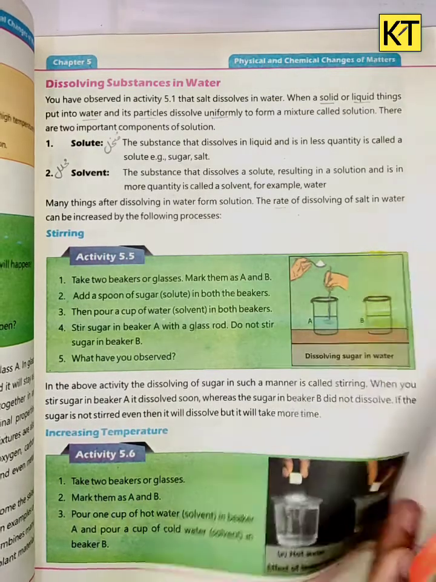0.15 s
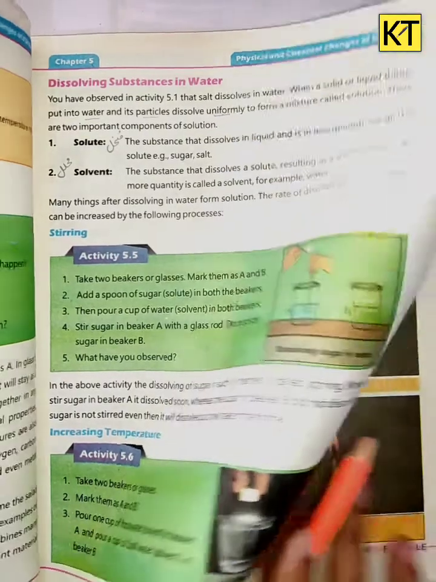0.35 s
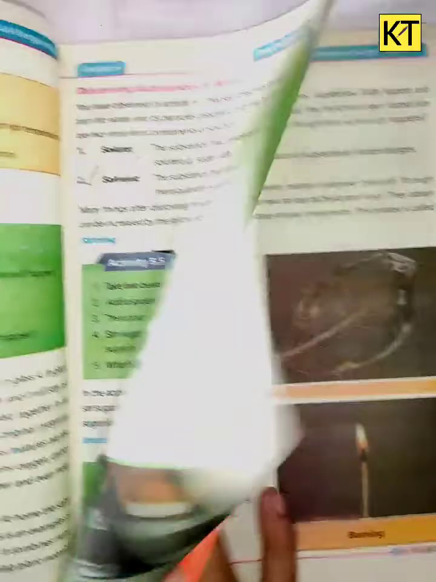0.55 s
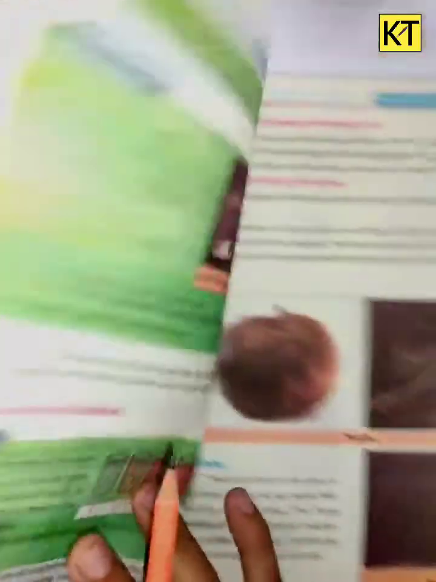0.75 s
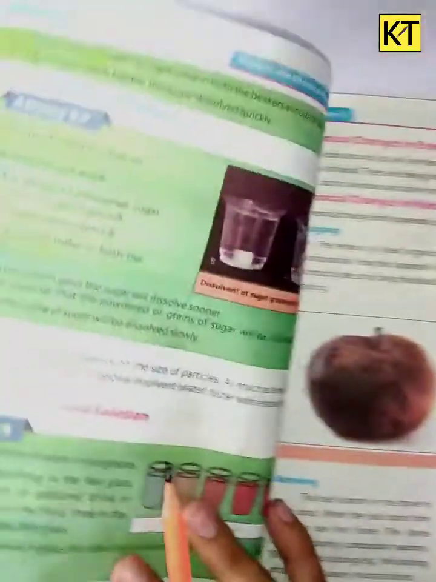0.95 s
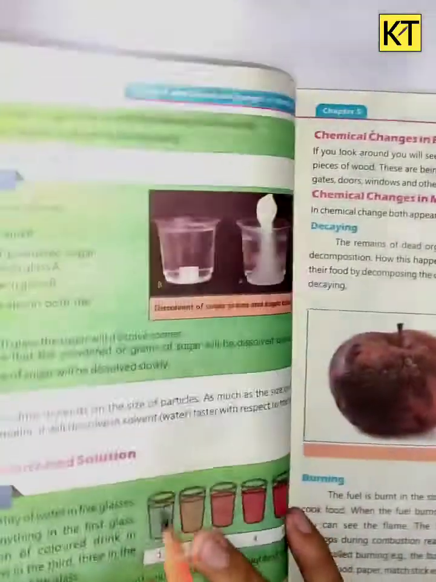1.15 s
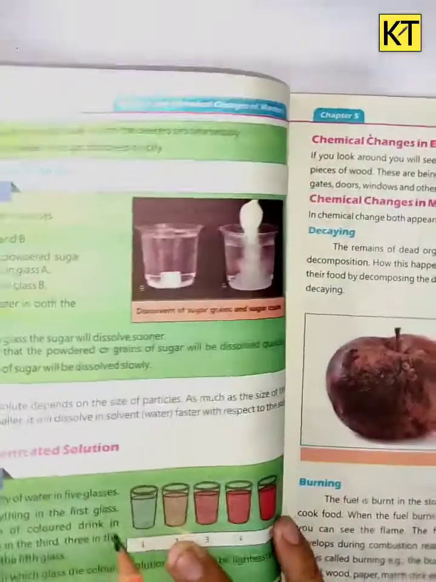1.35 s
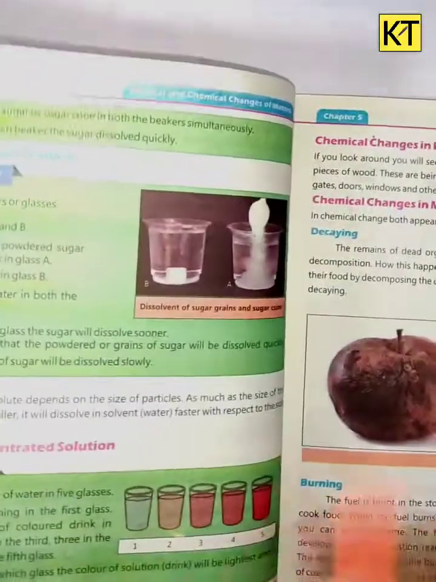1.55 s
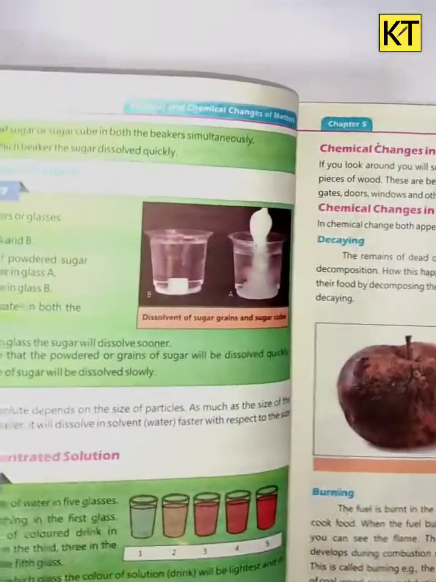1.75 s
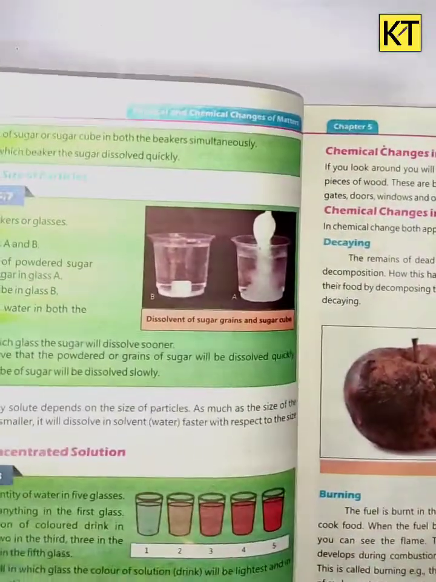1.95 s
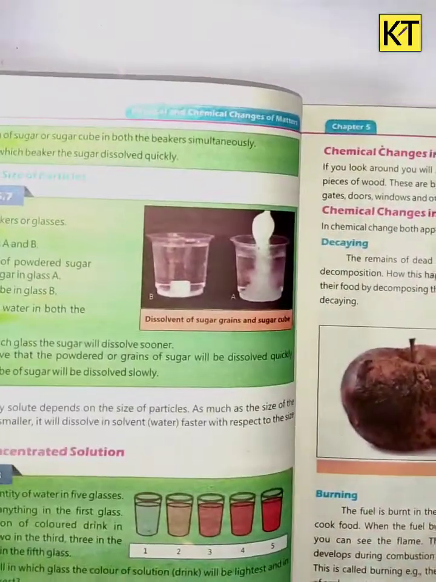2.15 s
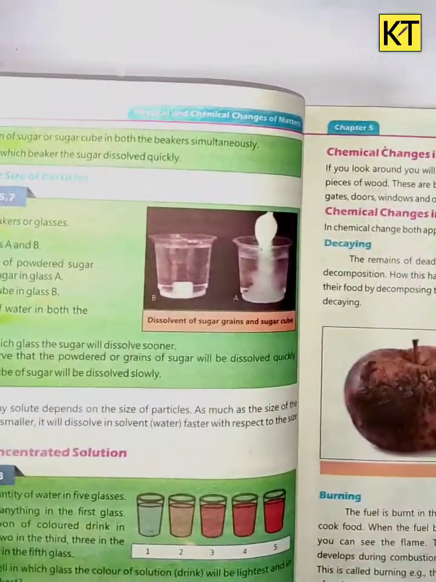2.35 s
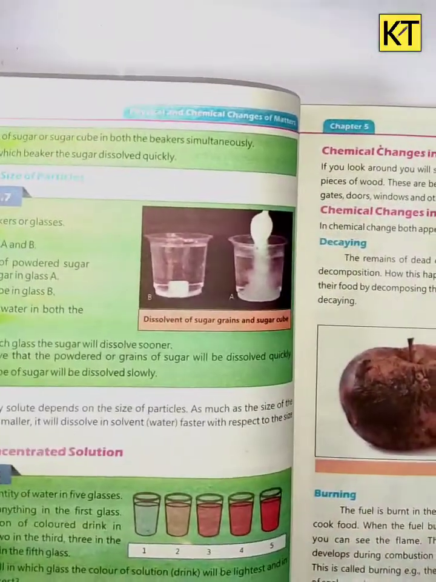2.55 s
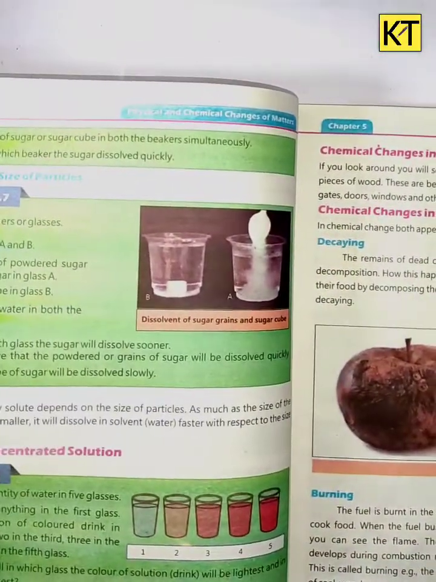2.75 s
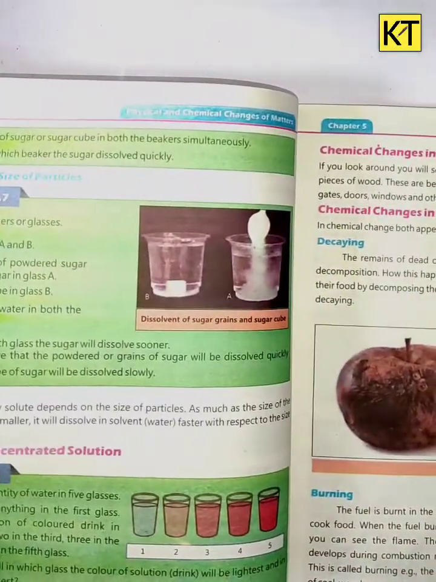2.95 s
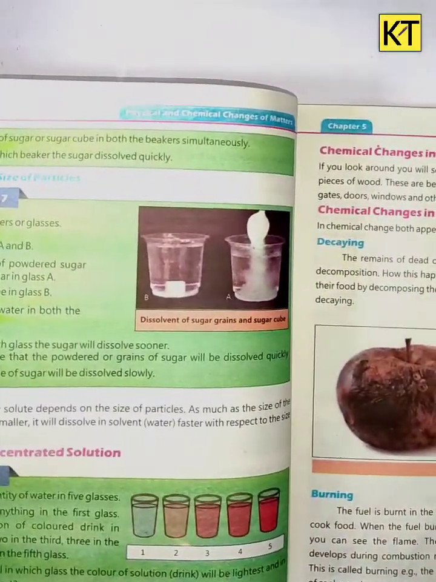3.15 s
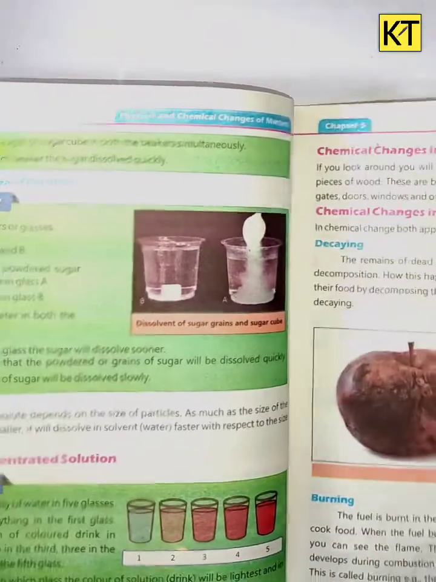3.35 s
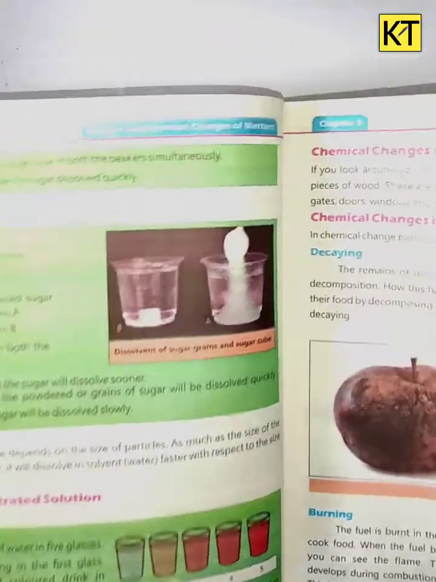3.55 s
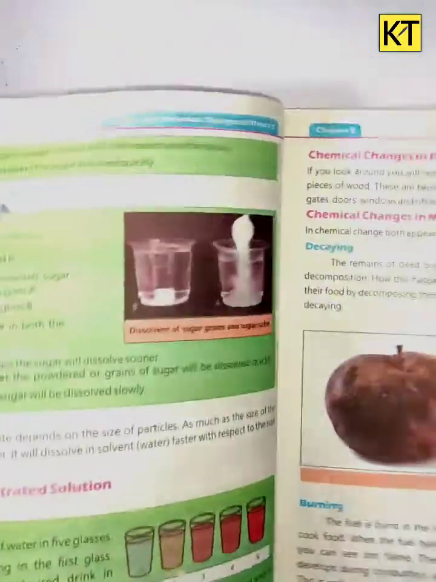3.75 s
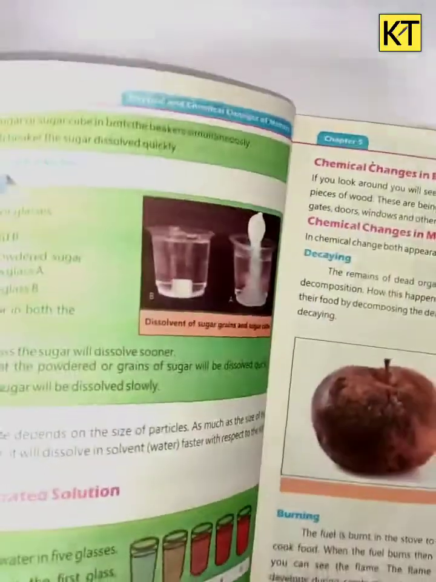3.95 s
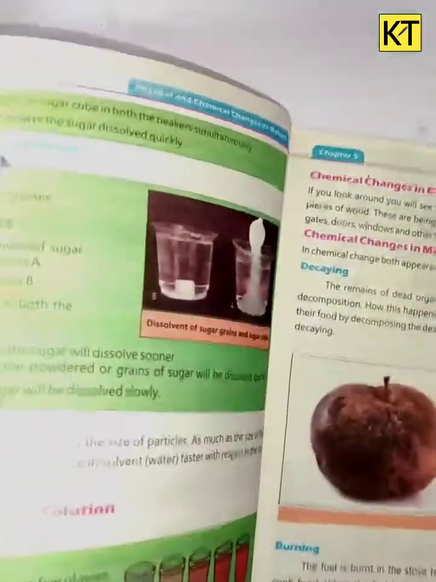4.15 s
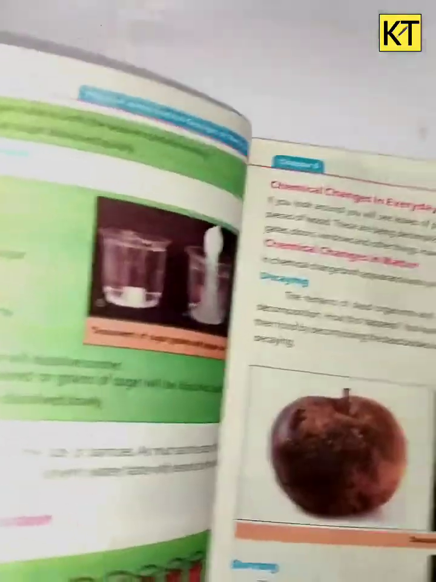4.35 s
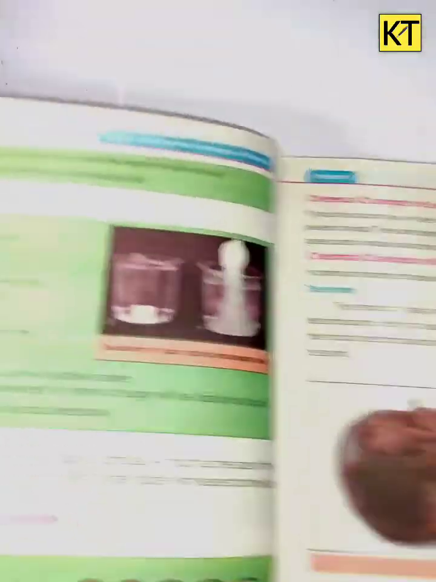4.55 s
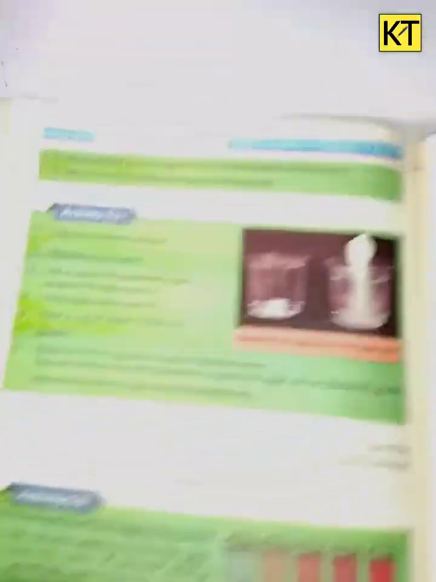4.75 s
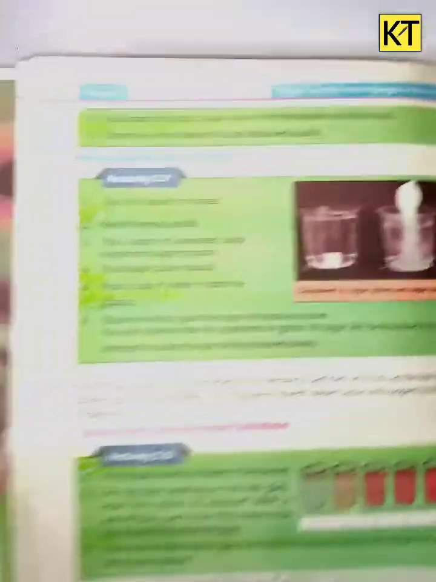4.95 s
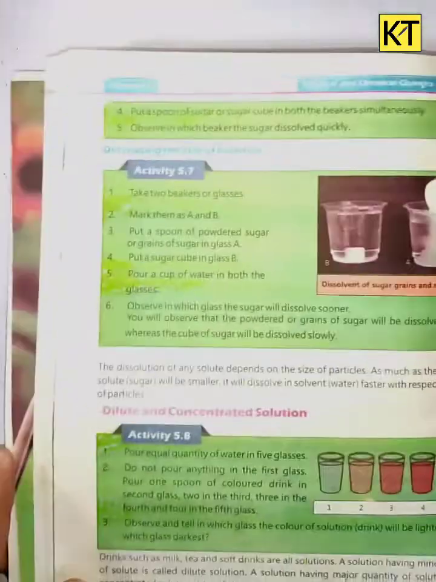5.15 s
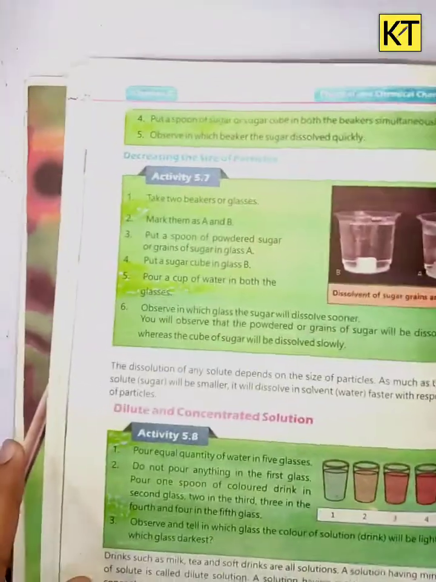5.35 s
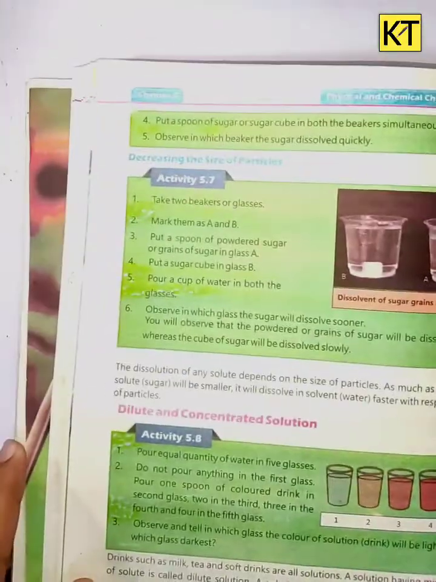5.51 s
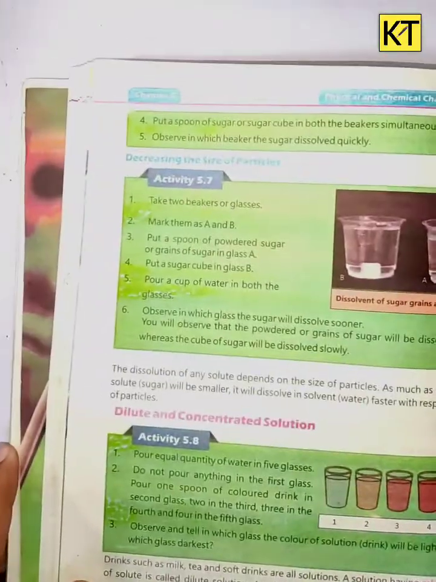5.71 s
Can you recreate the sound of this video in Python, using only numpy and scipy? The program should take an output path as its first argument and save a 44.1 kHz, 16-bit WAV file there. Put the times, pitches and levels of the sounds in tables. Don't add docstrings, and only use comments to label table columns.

```python
import sys
import numpy as np
from scipy import signal
from scipy.fft import rfft, irfft, next_fast_len
from scipy.io import wavfile
from scipy.ndimage import uniform_filter1d

SR = 44100
rng = np.random.default_rng(int(sys.argv[2]) if len(sys.argv) > 2 else 0)


def transcribe(signal):
    frames = np.atleast_2d(signal).T
    limited = np.clip(frames, -1, 1)
    pcm = np.round(limited * 32767).astype(np.int16)
    wavfile.write(sys.argv[1], SR, pcm)


def elevation(decibels):
    levels = np.asarray(decibels, float)
    return 10 ** (levels / 20)


N = 254795


def at_hz(points, hz, column=1):
    points = np.array(points)
    return np.interp(np.log(np.maximum(hz, 1)), np.log(points[:, 0]), points[:, column])


def rms_one(x):
    return x / np.sqrt(np.mean(x ** 2) + 1e-20)


def peak_one(x):
    return x / np.max(np.abs(x))


def drift(rate):
    r = np.exp(-80 * np.pi * rate / SR)
    white = rng.standard_normal(N // 40 + 2002)
    slow = signal.lfilter([1], [1, -2 * r, r * r], white)[2000:]
    return np.interp(np.arange(N) / 40, np.arange(len(slow)), rms_one(slow))


def ring(clicks, hz, t60):
    r = elevation(-60 / (t60 * SR))
    w = 2 * np.pi * hz / SR
    return signal.lfilter([0, np.sin(w)], [1, -2 * r * np.cos(w), r * r], clicks)


def colour(x, gain_db):
    size = next_fast_len(x.shape[-1])
    hz = np.arange(size // 2 + 1) * SR / size
    return irfft(rfft(x, size) * elevation(gain_db(hz)), size)[..., :x.shape[-1]]


def filtered(x, order, hz, kind):
    return signal.sosfilt(signal.butter(order, hz, kind, fs=SR, output="sos"), x)


# (frequency [Hz], left-right likeness [0 to 1])
PORT_LIKENESS = [(60, 0.17), (180, 0.17), (550, 0.5), (1650, 0.13), (4970, 0.0066), (15000, 0.26)]
EDGES = 20 * 2 ** np.arange(0, 9.8, .4)


def bands(white, low_hz, high_hz):
    for k, (low, high) in enumerate(zip(EDGES, EDGES[1:])):
        hz = np.sqrt(low * high)
        if low_hz <= hz < high_hz:
            mid, side = filtered(white[k % 2], 2, [low, high], "band")
            alike = np.clip(at_hz(PORT_LIKENESS, hz), 0, 1)
            yield hz, np.sqrt(1 + alike) * mid + np.sqrt(1 - alike) * side * [[1], [-1]]


def strokes(rows, bend):
    fall_db = 17.5
    t = np.arange(0, N + 64, 64) / SR
    power = 1e-11
    for s, rise, fall, level_db, second_db in rows:
        after = np.maximum(t - s - rise, 0) / max(fall, .01)
        swell = np.clip((t - s) / max(rise, .003), 0, 1)
        shape = swell * elevation(level_db - fall_db * after ** bend)
        power = power + (shape * elevation(np.array([[0], [second_db]]))) ** 2
    return [np.interp(np.arange(N) / SR, t, np.sqrt(p)) for p in power]


# (frequency [Hz], level [dB per Hz])
AIR_COLOUR = [(12, -24), (25, -2), (100, -10.5), (377, -17.5), (873, -20), (1400, -24), (2400, -26.5),
              (3600, -33), (7000, -33.5), (8800, -33.5), (10000, -43), (12500, -38), (14800, -47.5),
              (15500, -46), (15900, -65.5)]


def air():
    level_db, rumble_lumps_db, rumble_below_hz = -60.5, 4.5, 130
    white = colour(rng.standard_normal((2, 2, N)), lambda hz: at_hz(AIR_COLOUR, hz))
    hush = 0
    for hz, band in bands(white, 20, 17000):
        lumps_db = -rumble_lumps_db if hz < rumble_below_hz else 1.5
        hush = hush + elevation(lumps_db * drift(2.7)) * band
    return elevation(level_db - 5.5) * rms_one(hush)


# (frequency [Hz], level [dB], t60 [s])
ROOM_ECHO = [(97, -9, 0.82), (304, -23.5, 0.7), (886, -19, 0.39), (2500, -16, 0.32), (7040, -12.5, 0.52),
             (14200, -44, 0.15)]


def room():
    t = np.arange(SR * 3 // 4) / SR
    echo = 0
    for hz, band in bands(rng.standard_normal((2, 2, len(t))), 60, 17000):
        t60 = at_hz(ROOM_ECHO, hz, column=2)
        echo = echo + elevation(at_hz(ROOM_ECHO, hz) - 60 * t / t60) * band
    return echo * (1 - np.exp(-(t / 0.0063) ** 2)) * elevation(-24)


# (time [s], peak level [dB])
TABLE_BUMPS = [
    (1.408, -42.5),
    (2.118, -55.5),
    (2.929, -52.5),
    (3.814, -34.5),
    (3.989, -48.5),
    (4.521, -47.5),
    (5.1, -51.5),
]


def table():
    hum_hz, hum_t60_s = 92, 0.19
    pushes = np.zeros(N) + 1e-18
    pushes[[round(s * SR) for s, db in TABLE_BUMPS]] = elevation(np.array(TABLE_BUMPS)[:, 1] - 25.5)
    n = np.arange(700)
    unsteady = .07 + .3 * rng.standard_normal(700)
    nudge = np.hanning(700) * unsteady * np.sin(n * 2 * np.pi * hum_hz / SR)
    soft = np.convolve(pushes, nudge)[:N]
    return filtered(ring(soft, hum_hz, hum_t60_s), 2, 140, "low")


# (frequency [Hz], level [dB per Hz])
PAPER_COLOUR = [(76, -44), (130, -20), (166, -12.5), (335, -11), (1000, -4), (1700, -7.5), (2800, -10.5),
                (3600, -12), (6900, 0), (8600, -5.5), (9800, -10), (12100, -24), (14800, -11), (15500, -18),
                (15900, -50)]
# (start [s],
# rise [s], fall [s], hiss level [dB], scrape level [dB re hiss])
FINGER_GLIDES = [
    (.172, 0.085, 0.28, -37.5, -6.5),
    (.3, 0.16, 0.082, -39.5, -11),
    (.4, 0.05, 0.28, -43, -1),
    (.555, 0.098, 0.094, -39, -7),
    (.745, 0.015, 1, -53.5, 4),
    (.83, 0.063, 0.11, -47, -2),
    (.96, 0.058, 0.11, -51, -3.5),
    (1.11, 0.042, 0.13, -40.5, -6.5),
    (1.245, 0.077, 0.3, -53, -8),
    (1.52, 0.046, 0.12, -51, -4.5),
                 (1.79, 0.027, 0.17, -59.5, -13.5), (2.02, 0.0059, 0.043, -65, 10),
               (2.209, 0.061, 0.078, -52, -1), (2.43, 0.0087, 0.15, -67.5, -2.5),
               (2.673, 0.0079, 0.057, -66, 0), (2.749, 0.12, .05, -71, 0), (2.898, 0.068, 0.15, -46.5, 2),
               (3.07, 0.082, 0.17, -65, 3), (3.18, 0.043, 0.39, -65, 2.5), (3.42, 0.015, 0.12, -57, 13),
               (3.6, 0.1, 0.14, -63.5, -2), (3.739, 0.05, 0.042, -51, 4), (3.83, 0.079, 0.13, -60.5, -3),
               (3.979, 0.0081, 0.14, -64.5, 4.5), (4.15, 0.073, 0.39, -70, 1.5),
               (4.389, .18, 0.15, -61.5, -2.5), (4.75, .14, 0.057, -65.5, -1.5),
               (4.92, 0.18, 0.051, -61.5, -3), (5.346, 0.025, 0.11, -53, -2),
               (5.47, 0.038, 0.071, -65.5, 4), (5.57, 0.037, 0.082, -71, -5)]
# (start [s], rise [s],
# fall [s], rub level [dB], flutter level [dB re rub])
SHEET_RUBS = [
    (.18, 0.06, 1, -57.5, -8.5),
    (.42, 0.11, 0.048, -48, -8),
    (.55, 0.054, 0.23, -50, -10),
    (.742, 0.012, 1, -51, -7.5),
    (.96, 0.0075, 0.23, -58, -22),
    (1.04, .04, 0.073, -51, -14),
    (1.12, 0.015, 0.11, -50, -8.5),
    (1.245, .01, 0.3, -63.5, 0),
    (1.53, 0.0079, 0.095, -60, -1),
              (1.8, 0.027, 0.041, -60, -12), (2.1, 0.16, 0.12, -66, -5), (2.219, 0.041, 0.07, -53.5, -9.5),
             (2.4, .2, 0.38, -76, -5), (2.899, .01, 0.28, -50.5, -12), (3.03, 0.076, 0.047, -48, -31),
             (3.13, 0.04, 0.31, -60, -11), (3.25, 0.16, 0.16, -59, -6), (3.42, 0.02, 0.13, -46, -7.5),
             (3.55, 0.051, 0.34, -63, -6), (3.741, 0.015, 0.25, -50, -9.5), (3.83, .05, 0.3, -59, -9),
             (3.99, 0.01, 0.14, -56.5, 5.5), (4.1, 0.17, 0.3, -71, -3.5), (4.4, 0.11, 0.17, -63, -2.5),
             (4.7, 0.2, 0.029, -68, 1), (4.921, 0.17, .04, -64, -1.5), (5.1, 0.012, 0.18, -74.5, 14),
             (5.25, 0.018, 0.17, -60.5, 7), (5.35, 0.022, 0.18, -59.5, 2), (5.46, 0.042, 0.047, -52.5, -11),
             (5.57, 0.091, 0.32, -74, 3)]


def slide(grain_db, patchy_db):
    rub, flutter = strokes(SHEET_RUBS, bend=1.33)
    hiss, scrape = strokes(FINGER_GLIDES, bend=1.5)
    catches = uniform_filter1d(rng.exponential(1, N), size=24)
    grains = elevation(grain_db * np.minimum(catches, 3))
    white = colour(rng.standard_normal((2, 2, N)) * grains, lambda hz: at_hz(PAPER_COLOUR, hz))
    clumps = elevation(0.98 * drift(45))
    spans_hz = [(120, 680), (680, 1600), (1600, 3700), (3700, 17000)]
    out = 0
    for level, span in zip([flutter, rub, scrape, hiss], spans_hz):
        layer = sum(elevation(patchy_db * drift(9.6)) * band for hz, band in bands(white, *span))
        out = out + level * clumps * rms_one(layer)
    return out


# (start [s], rise [s], fall [s], level [dB], pitch [Hz])
EDGE_CREAKS = [
    (3.12, 0.13, .25, -61.5, 950),
    (3.8, 0.0205, 0.14, -47, 920),
    (4.441, .02, 0.084, -70.5, 1000),
    (5.38, 0.016, 0.022, -58.5, 1100),
    (0.575, 0.023, 0.16, -44.5, 2050),
    (4.99, 0.047, .06, -65, 1620),
]


def creaks():
    width = 0.3
    out = 0
    for *stroke, hz in EDGE_CREAKS:
        t60 = 2.2 / (width * hz)
        song = ring(ring(rng.standard_normal(N), hz, t60), hz, t60)
        out = out + strokes([(*stroke, 0)], bend=1.33)[0] * rms_one(song)
    return out


# (frequency [Hz], level [dB], t60 [s])
BLOCK_TONES = [(164.6, -21.5, 0.1), (179, -2, 0.087), (239.6, -6.5, 0.098), (306.5, 0.5, 0.08),
               (427, 1, 0.04), (560.4, -6, 0.16)]
# (frequency [Hz], level [dB])
SNAP_COLOUR = [(100, -17), (2500, 11), (3600, 7), (7000, 10.5), (9000, 2), (12000, -27), (15000, -5)]


def snaps(rows, rough_share):
    t = np.arange(4096) / SR
    out = np.zeros((2, N + len(t)))
    pushes = np.zeros(N + len(t))
    for s, peak_db, hz, crack_db, thump_db, t60 in rows:
        here = slice(round(s * SR), round(s * SR) + len(t))
        t60 = np.clip(t60, .006, .06)
        burst = (t / t60) ** 2 * elevation(-90 * t / t60)
        jerks = rng.standard_normal((4, len(t))) * burst
        phase = 2 * np.pi * hz * (t + 1.07 * 0.00146 * (1 - np.exp(-t / 0.00075)))
        rough = ring(ring(jerks[0], 0.85 * hz, 2.02 / hz), 0.85 * hz, 2.02 / hz)
        panel = 0.64 * peak_one(np.sin(phase) * burst) + rough_share * peak_one(rough)
        early = jerks[1:3] * np.exp(-t / 0.0041)
        wide = ring(ring(early, 1.82 * hz, 1.2 / hz), 1.82 * hz, 1.2 / hz)
        body = peak_one(panel + .5 * peak_one(wide))
        fade = np.exp(-t / 0.0014) + .05 * np.exp(-t / .015)
        hiss = rng.standard_normal((2, len(t))) * (1 - np.exp(-t / .0011)) * fade
        crack = peak_one(filtered(hiss, 2, 1900, "high"))
        out[:, here] += elevation(peak_db) * (body + elevation(crack_db + 12) * crack)
        shove = rng.standard_normal(len(t)) * (1 - np.exp(-t / 0.0076)) * np.exp(-t / 0.013)
        pushes[here] += elevation(peak_db + thump_db + 4.5) * shove
    block = 0
    for k, (hz, db, t60) in enumerate(BLOCK_TONES):
        block = block + elevation(db - 27.0) * ring(np.roll(pushes, 40 * k) + 1e-18, hz, t60)
    sheet = colour(out, lambda hz: at_hz(SNAP_COLOUR, hz)) + block
    return filtered(sheet, 8, 146, "high")[:, :N]


def with_t60_last(rows):
    thump_db = -45.5
    return [(*row[:4], thump_db, row[4]) for row in rows]


# (time [s], peak level [dB],
# pitch [Hz], crack level [dB re peak], t60 [s])
CLEAN_JUMPS = [(0.494, -39, 1400, -24.5, 0.013), (0.53, -46, 1050, -25, 0.035),
               (0.609, -46, 2050, -18, 0.015), (0.665, -45, 1700, -25, 0.013), (1.408, -48, 900, -18, .04),
               (1.42, -31, 180.6, -48, .06), (1.3, -42, 174, -50, 0.046), (1.455, -42, 398, -23.5, .04),
               (2.9447, -33.5, 1300, -25, 0.0092), (2.978, -45, 1190, -22, 0.0091),
               (2.9935, -30.5, 1040, -18, 0.0094), (3.443, -31, 916, -23, 0.013),
               (3.8128, -4.5, 543, -48, 0.011), (4.318, -55, 554, -33.5, 0.033),
               (4.733, -56.5, 550, -25, 0.019), (4.755, -60, 1300, -20, 0.013), (4.88, -58, 930, -24, .02),
               (5.1, -29.5, 445, -40, 0.033), (3.704, -53, 900, -25, .012), (0.945, -40.5, 200, -50, .06),
               (2.0178, -24.5, 620, -42, 0.0074), (2.024, -37.5, 565, -40, 0.048),
               (2.232, -47.5, 1400, -21, 0.042), (2.9673, -35.5, 1032, -25, 0.013),
               (2.9495, -39, 1400, -23, .006), (2.961, -38, 1130, -23, 0.0093),
               (3.008, -48, 1350, -30, .04), (3.418, -35, 820, -28.5, 0.082),
               (1.82, -56.5, 900, -30, 0.046), (3.476, -40, 900, -21.5, .008),
               (2.005, -52, 600, -27, 0.045), (3.8985, -20, 880, -50, 0.018), (3.938, -40, 900, -30, .012),
               (3.853, -33.5, 700, -40, .015), (5.489, -53.5, 1230, -24, 0.014),
               (5.41, -48, 600, -25, .015), (5.7, -50, 1280, -16.5, 0.009), (4.598, -61, 1210, -15, .01),
               (5.354, -59.5, 2300, -7, 0.011)]


def jumps():
    return snaps(with_t60_last(CLEAN_JUMPS), rough_share=0.23)


# (time [s], peak level [dB], panel pitch
# [Hz], crack level [dB re peak])
SHEET_CREASES = [
    (0.082, -84, 625, 17),
    (0.497, -33, 1056, -11),
    (0.517, -36.5, 2080, -38),
    (0.595, -43, 2140, 4),
    (0.749, -40, 1000, -25),
    (0.882, -41.5, 1120, -29),
    (0.958, -29, 1126, -42),
    (1.067, -39, 1084, -30),
    (1.099, -41, 1037, -32.5),
    (1.148, -50, 1147, -14.5),
                 (1.786, -43.5, 720, -10.5), (2.014, -30, 1492, -12.5), (2.241, -40.5, 1578, -13),
                (2.262, -55, 1200, 2), (2.2703, -46.5, 1750, -1), (2.679, -49.5, 548, -9.5),
                (2.814, -62, 1300, -29), (2.839, -57.5, 1366, -5), (2.9148, -38.5, 1150, -7),
                (2.945, -43, 1395, -17), (2.95, -44, 1360, -23), (2.96, -49, 1310, -10),
                (2.967, -46, 1070, -10), (2.993, -38.5, 1400, 1.5), (3.034, -37.5, 952, -6.5),
                (3.415, -24.5, 888, -17), (3.426, -37, 824, -19), (3.457, -39, 2056, -17.5),
                (3.578, -44.5, 1440, -35.5), (3.616, -41, 704, -35), (3.691, -40.5, 556, -25.5),
                (4.949, -57.5, 644, -29), (5.433, -48, 784, -29)]
# (time [s], peak level [dB], panel pitch [Hz], crack level [dB
# re peak], thump level [dB re peak])
FLAPS = [(0.707, -46.5, 1165, 4, -10), (0.789, -41, 1190, -12.5, -11), (1.405, -29.5, 364, -25.5, -8.5),
         (1.417, -53, 295, -4.5, -10), (2.0142, -34, 780, -35, -11.5), (2.768, -51, 480, -25, -21),
         (2.908, -50, 950, 5, -8), (3.443, -37.5, 1290, -1.5, -18), (3.474, -36, 746, -11, -19),
         (3.812, -22, 955, -15.5, -4.5), (3.8974, -24.5, 1250, -54, -14.5),
         (3.983, -27.5, 1040, -23, -12.5), (4.021, -43.5, 520, -18, -12), (4.142, -42, 551, -21.5, -13.5),
         (4.479, -46.5, 543, -19, -11.5), (4.626, -41, 527, -19.5, -18), (5.093, -25, 652, -37, -16),
         (5.252, -36.5, 670, -36, -20.5), (5.292, -48, 600, -17, -28), (5.39, -44, 813, -11.5, -14),
         (5.488, -43.5, 440, -25, -11), (5.594, -58.5, 1145, -6.5, -20), (5.7, -44, 982, -24, -7.5),
         (5.707, -67, 298, -43, -12),
         (4.752, -50, 397, -27, -16.5),
    (4.796, -45, 564, -22.5, -13),
]
# (time [s], peak level [dB], pitch [Hz], crack level [dB re peak], t60 [s])
LEADING_EDGES = [(1.7843, -50, 2726, -32, 0.0097), (3.616, -46.5, 2344, -28, 0.012),
                 (3.8112, -22.5, 1914, -19, 0.0042), (5.2527, -36, 1213, -35, 0.0089),
                 (3.7908, -40, 1250, -4.5, 0.01), (3.814, -10, 303, -59, 0.044),
                 (3.824, -21, 569, -65.5, 0.045), (5.0945, -43, 1310, -39, 0.014),
                 (.722, -37, 204, -44, 0.037), (1.067, -33.5, 1710, -30, 0.013),
                 (2.967, -39, 2090, -16, 0.0092)]


def buckles():
    ring_s, ring_at_db = .017, -39
    shorter = 0.058
    crease_thump_db = -34
    creases = [(*row, crease_thump_db) for row in SHEET_CREASES]
    rows = [(*row, ring_s * elevation(shorter * (ring_at_db - row[1]))) for row in creases + FLAPS]
    return snaps(rows + with_t60_last(LEADING_EDGES), rough_share=0.87)


def scene():
    rustle = air() + table() + slide(grain_db=0.5, patchy_db=3.0) + creaks()
    hits = jumps() + buckles()
    echoes = signal.fftconvolve(hits.mean(axis=0, keepdims=True), room(), axes=1)[:, :N]
    return hits + echoes + rustle


# (frequency [Hz], share of cells muted [0 to 1])
DROPOUTS = [(2600, 0), (3200, .33), (5200, .25), (6800, .13), (8600, .2), (9500, .74), (13000, .66),
            (14500, .25)]


def thin_out(x):
    sudden_db = 7
    hz, _, cells = signal.stft(x, SR, nperseg=2048, noverlap=1536)
    chance = uniform_filter1d(rng.standard_normal(cells.shape[1:]), size=11, axis=0)
    chance = rms_one(uniform_filter1d(chance, size=5, axis=1))
    rank = (1 + np.tanh(.85 * chance)) / 2
    share = np.clip(at_hz(DROPOUTS, hz), 0, 1)[:, None]
    treble = np.abs(cells)[:, hz > 2000].mean(axis=(0, 1))
    sudden = treble > elevation(sudden_db) * signal.medfilt(treble, kernel_size=11)
    loudness = uniform_filter1d(treble, size=25) / np.median(treble)
    busy = np.clip(.45 + .3 * np.log(loudness), .3, 1.1)
    muted = (rank < share * np.where(hz[:, None] < 9000, busy, 1)) & ~sudden
    return signal.istft(cells * np.where(muted, .02, 1), SR, nperseg=2048, noverlap=1536)[1][:, :N]


# (frequency [Hz], left over right [dB])
LEFT_OVER_RIGHT = [(60, 3), (150, 5), (380, 4.5), (950, 4), (2380, 0), (5980, -2), (15000, 1.5)]


def band_limit(x):
    return signal.sosfilt(signal.butter(12, 16810, fs=SR, output="sos"), x)


def record(dry):
    tilt = np.array([[.5], [-.5]])
    ports = colour(dry, lambda hz: tilt * at_hz(LEFT_OVER_RIGHT, hz))
    ports[1] = np.roll(ports[1], 4)
    top_cut = signal.cheby2(10, 50, 17100, fs=SR, output="sos")
    mix = thin_out(signal.sosfilt(top_cut, ports))
    return band_limit(mix)


dry = scene()
out = record(dry)
transcribe(out)
```